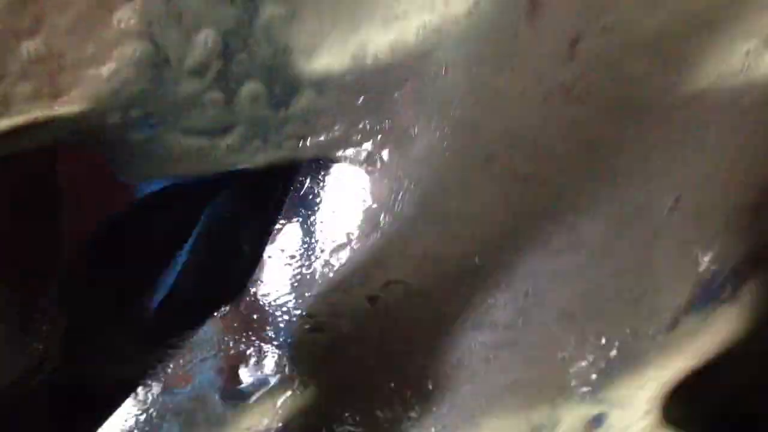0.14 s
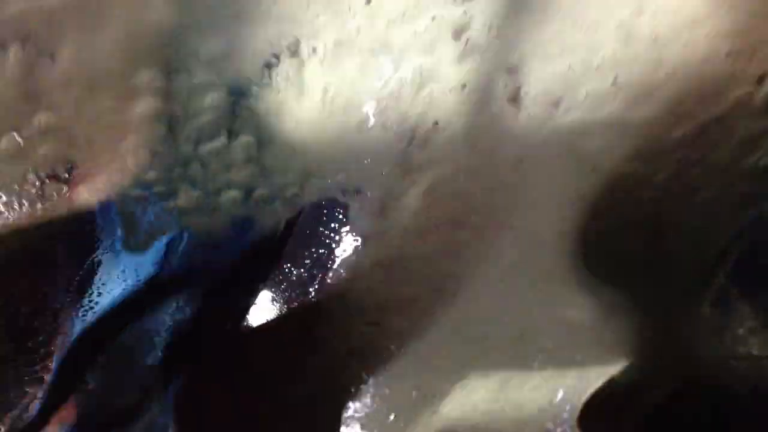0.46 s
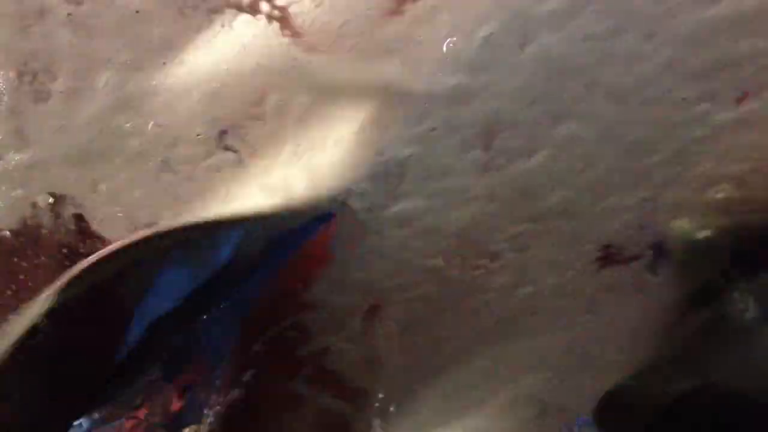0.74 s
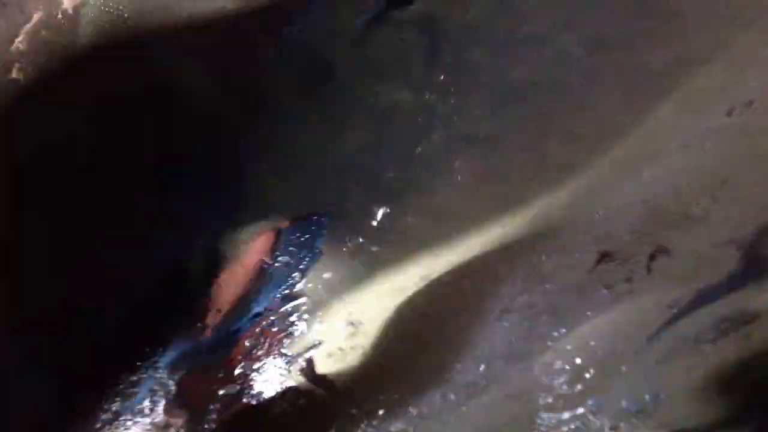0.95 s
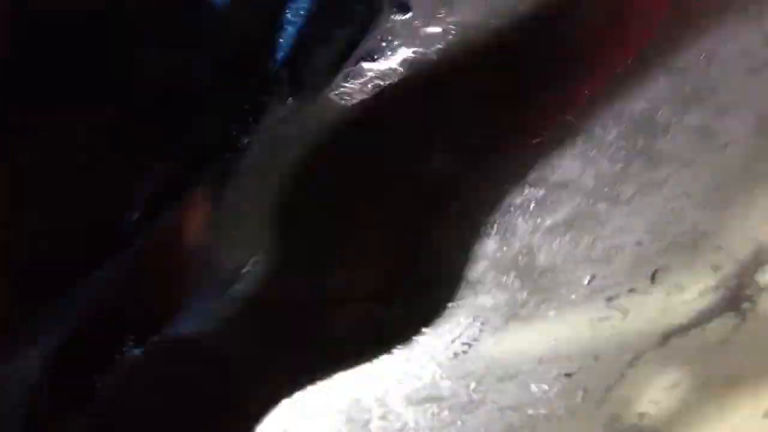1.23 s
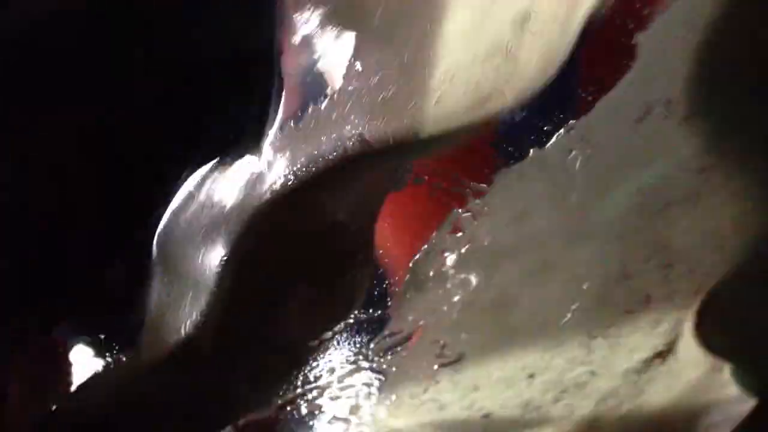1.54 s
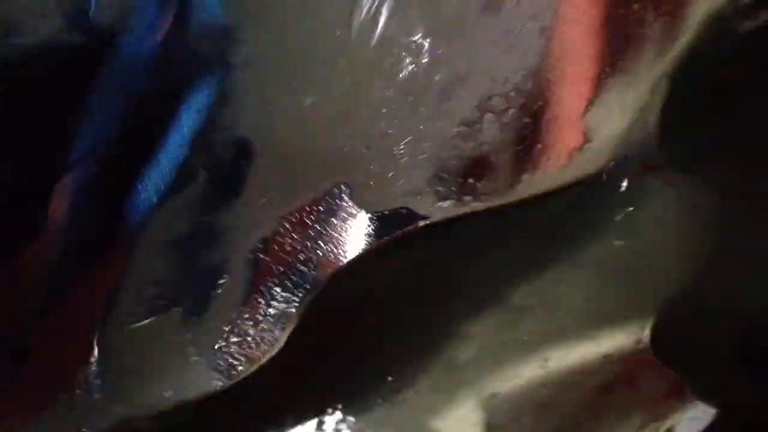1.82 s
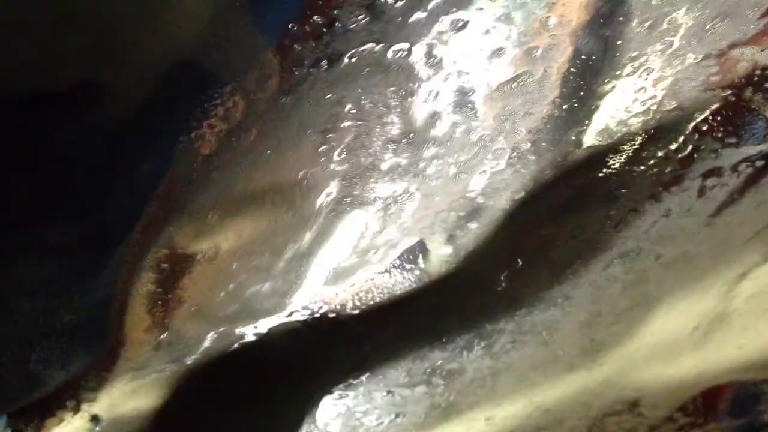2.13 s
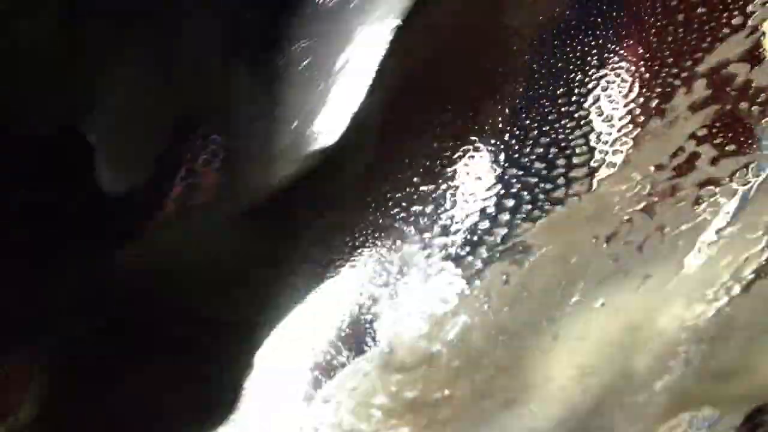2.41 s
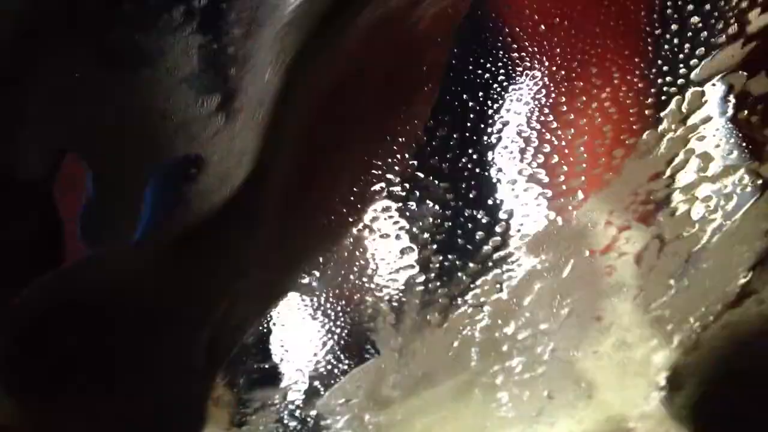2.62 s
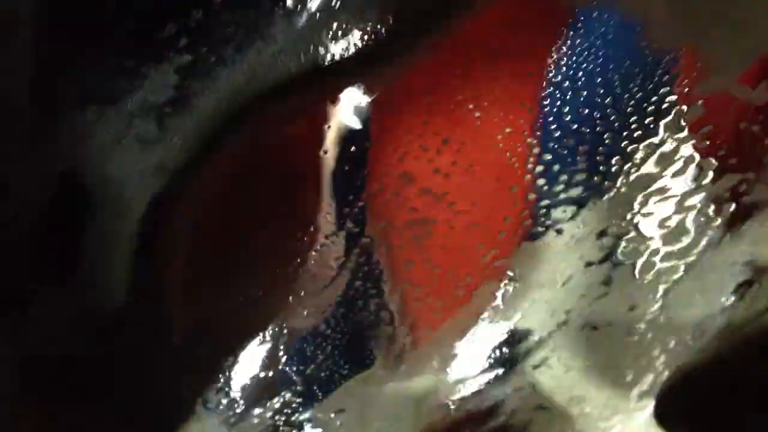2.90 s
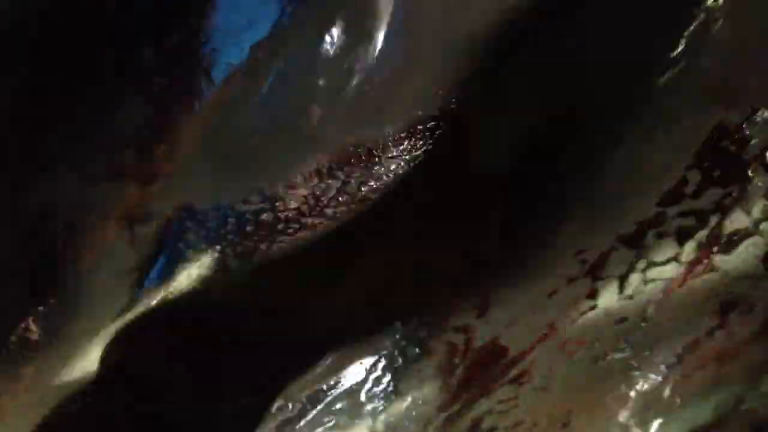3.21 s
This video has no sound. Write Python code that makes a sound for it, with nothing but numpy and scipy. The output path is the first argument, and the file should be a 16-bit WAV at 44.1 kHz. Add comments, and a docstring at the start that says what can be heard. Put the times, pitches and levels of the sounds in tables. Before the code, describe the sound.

Automatic car wash from inside the car, mono, dry cabin. Throughout, wet cloth strips slap the glass irregularly, about twenty times a second, splashy and crisp with duller smacks; a sharp one lands near 1.7 s. Low rumble stays steady; water hiss thins after 2 s. Soft panel booms grow heavier and rattlier from 1.9 to 2.9 s, strongest near 2.4. Brief faint hollow rubs, mostly before 1.8 s, one at 3.3.

```python
"""Inside a car in an automatic wash: wet cloth strips of a turning brush slap the glass unevenly, some twenty
times a second, each a burst of noise and droplets with spray, fine mist and a duller, lower smack.
Heavier bunches thump the body panels: two decaying modes boom and higher ones rattle as filtered noise.
Slow-wavering low noise is the machinery's rumble through the panels; ticking bright noise is the water's hiss.
Now and then cloth rubs the glass with a brief hollow note, a single wavering tone."""
import sys
import numpy as np
from scipy import signal
from scipy.fft import rfft, irfft, next_fast_len
from scipy.io import wavfile
from scipy.ndimage import uniform_filter1d, map_coordinates

SR = 44100
rng = np.random.default_rng(int(sys.argv[2]) if len(sys.argv) > 2 else 0)


def attenuation_scalar(level_db):
    """Turn a level in dB into a linear amplitude multiplier (20 dB per decade)."""
    decades = np.asarray(level_db, float) / 20
    return 10 ** decades


def pcm_store(signal):
    """Save signal as 16-bit PCM."""
    levels = np.round(np.clip(np.atleast_2d(signal), -1, 1) * 32767)
    wavfile.write(sys.argv[1], SR, levels.astype(np.int16).T)


N = 148176  # samples

# Cloth strips on the glass. Each row: peak time in seconds, spray level in dB, rise and fall in seconds
# per 10 dB (each layer scales the fall), smack level in dB ahead of the common smack gain.
STRIPS_ON_GLASS = [(0.073, -28.5, 0.013, 0.019, -30), (0.1285, -40, 0.0067, 0.0095, -37),
                   (0.1528, -28, 0.0023, 0.018, -28.5), (0.178, -34.5, 0.025, 0.0079, -36.5),
                   (0.1877, -27, 0.0054, 0.014, -29), (0.2298, -48, 0.01, 0.016, -40),
                   (0.268, -34.5, 0.002, 0.024, -36.5), (0.2884, -29, 0.01, 0.024, -32.5),
                   (0.395, -29.5, 0.01, 0.017, -27), (0.476, -45, 0.0026, 0.02, -38),
                   (0.494, -29, 0.0066, 0.011, -30.5), (0.518, -27.5, 0.016, 0.013, -30.5),
                   (0.583, -31.5, 0.0057, 0.02, -31), (0.6277, -29.5, 0.024, 0.013, -29),
                   (0.706, -31.5, 0.0035, 0.0097, -33), (0.7273, -28.5, 0.013, 0.016, -30.5),
                   (0.7607, -34, 0.0049, 0.023, -38), (0.836, -42, 0.0016, 0.02, -34),
                   (0.8475, -26.5, 0.0015, 0.023, -34), (0.862, -26.5, 0.012, 0.012, -30.5),
                   (0.921, -40, 0.002, 0.048, -40), (0.955, -29.5, 0.0036, 0.017, -35),
                   (0.9666, -29, 0.013, 0.009, -32.5), (1.027, -47, 0.0012, 0.024, -43),
                   (1.074, -31.5, 0.022, 0.0215, -32.5), (1.1397, -36.5, 0.017, 0.0152, -43),
                   (1.1612, -37, 0.018, 0.007, -37), (1.1804, -27, 0.009, 0.017, -30.5),
                   (1.2298, -44, 0.056, 0.018, -39), (1.2693, -35.5, 0.011, 0.027, -32.5),
                   (1.295, -33, 0.0048, 0.034, -30), (1.382, -31, 0.0006, 0.037, -36),
                   (1.4004, -28, 0.0064, 0.011, -27), (1.433, -36.5, 0.0077, 0.0016, -31.5),
                   (1.5234, -26, 0.022, 0.011, -27), (1.6054, -36, 0.0031, 0.0093, -34),
                   (1.6508, -31.5, 0.041, 0.019, -30), (1.6745, -40, 0.0022, 0.03, -39),
                   (1.7214, -31.5, 0.0069, 0.051, -32.5), (1.7384, -20, 0.0022, 0.016, -28),
                   (1.828, -40, 0.024, 0.011, -33), (1.866, -25, 0.0059, 0.023, -29),
                   (1.9136, -39, 0.0085, 0.022, -33), (1.988, -29.5, 0.0045, 0.026, -29),
                   (2.0311, -39, 0.013, 0.0056, -32.7), (2.077, -29.5, 0.0018, 0.016, -30.5),
                   (2.093, -32.5, 0.0052, 0.015, -30.5), (2.168, -40, 0.0023, 0.016, -32),
                   (2.209, -31, 0.033, 0.019, -30), (2.272, -44, 0.003, 0.025, -33),
                   (2.309, -44.4, 0.0015, 0.0061, -43), (2.3291, -28.5, 0.0006, 0.019, -42),
                   (2.345, -30, 0.0076, 0.018, -27), (2.3792, -38.5, 0.0068, 0.015, -43),
                   (2.441, -35, 0.0008, 0.028, -40), (2.4546, -28.5, 0.0022, 0.028, -32.5),
                   (2.51, -32.5, 0.021, 0.0088, -26), (2.5704, -43, 0.0021, 0.034, -38.5),
                   (2.607, -25.5, 0.0085, 0.018, -27), (2.6823, -33.5, 0.0083, 0.0089, -40.5),
                   (2.7255, -36, 0.0046, 0.007, -40), (2.746, -26, 0.0069, 0.012, -25),
                   (2.8, -38.0, 0.016, 0.0083, -33.5), (2.846, -34.5, 0.002, 0.016, -33.5),
                   (2.8692, -38, 0.0084, 0.015, -37), (2.9, -44, 0.0021, 0.032, -39),
                   (2.955, -39, 0.0035, 0.0084, -32), (3.025, -43.5, 0.0099, 0.054, -41),
                   (3.093, -43.5, 0.014, 0.018, -34), (3.172, -36, 0.01, 0.016, -33.5),
                   (3.2047, -41.5, 0.0245, 0.0127, -41), (3.216, -34.5, 0.003, 0.018, -34.5),
                   (3.2398, -37.5, 0.0042, 0.027, -35.5), (3.2907, -43, 0.0051, 0.0124, -42),
                   (3.3053, -29, 0.0006, 0.013, -29.5)]


def unit(x):
    """Normalisation: scales a signal to rms 1."""
    return x / np.sqrt(np.mean(x ** 2) + 1e-20)


def over_time(rows):
    """Linear interpolation: (seconds, value) points become one value per sample."""
    return np.interp(np.arange(N) / SR, *np.transpose(rows))


def wobble(rate):
    """Slow random modulation: a smooth curve through random knots, rate of them a second."""
    knots = rng.standard_normal(N // 100)
    return map_coordinates(knots, [np.arange(N) * rate / SR])


def coloured(x, spectrum):
    """Linear filtering: x takes the gains of (Hz, dB) points on a log-frequency axis, at rms 1."""
    size = next_fast_len(N + 8192)
    hz, db = np.transpose(spectrum)
    bins_hz = np.fft.rfftfreq(size, 1 / SR)
    gain = attenuation_scalar(np.interp(np.log(bins_hz + 1), np.log(hz + 1), db))
    return unit(irfft(rfft(x, size) * gain, size)[:N])


def patchy(patchy_db, order):
    """Non-stationary noise: random gains smoothed over 5 bins (about 860 Hz) and order frames."""
    cells = signal.stft(rng.standard_normal(N), nperseg=256)[2]
    field = uniform_filter1d(rng.standard_normal(cells.shape), size=5, axis=0)
    field = uniform_filter1d(field, size=order, axis=1)
    noise = signal.istft(cells * attenuation_scalar(patchy_db * unit(field)), nperseg=256)[1]
    return unit(noise[:N])


def droplets(per_s):
    """Random impulse process: scattered ticks of uneven size, whose strength swells in clumps."""
    hits = rng.random(N) < per_s / SR
    sizes = rng.standard_normal(N)
    clumps = attenuation_scalar(3 * wobble(rate=300))
    return unit(hits * sizes * clumps)


def machinery():
    """Structure-borne sound: motors, pumps and lighter cloth keep the panels murmuring as low noise."""
    # Each row: frequency in Hz, relative density in dB per Hz.
    rumble_spectrum = [(15, -65), (25, -42), (59, -29), (100, -13.5), (135, -3), (165, -1.5), (200, -3.5),
                       (240, -9), (300, -4.5), (370, -6.5), (480, -16), (600, -18.5), (1400, -30.5),
                       (2500, -55.5)]
    # Each row: time in seconds, rumble level in dB ahead of the 2.7 dB lift below.
    rumble_course = [(0.0, -30), (0.35, -31.5), (1.24, -29), (1.44, -30), (1.84, -28.5), (2.22, -30),
                     (3.01, -30.5), (3.36, -30)]
    level_db = over_time(rumble_course) + 2.7 + 0.91 * wobble(rate=12)
    return attenuation_scalar(level_db) * coloured(patchy(patchy_db=1.35, order=8), rumble_spectrum)


def water():
    """Turbulence noise: jets and run-off hiss, with the sparse ticks of spatter among it."""
    # Each row: frequency in Hz, relative density in dB per Hz.
    hiss_spectrum = [(700, -43), (1400, 5.5), (2220, 3.5), (3200, -5.5), (4250, -6), (5280, -5.5),
                     (7310, -13), (9570, -24), (14400, -37), (17000, -40)]
    # Each row: time in seconds, hiss level in dB.
    hiss_course = [(0, -39), (.8, -44.5), (1.6, -41), (2.1, -51), (2.6, -49), (3.36, -46.5)]
    level_db = over_time(hiss_course) + 0.79 * wobble(rate=23)
    ticks = 0.25 * droplets(per_s=500)
    return attenuation_scalar(level_db) * coloured(ticks + patchy(patchy_db=2.5, order=6), hiss_spectrum)


def thumps():
    """Modal excitation: a soft push swells and damps two panel modes and rattles the higher ones."""
    # Cloth bunches on the panels. Each row: peak time in seconds, boom level in dB, boom frequency in Hz,
    # boom length in milliseconds between its -10 dB points, upper panel mode level in dB.
    bunches = [(0.106, -25.5, 164.7, 130, -53), (0.176, -28.5, 175, 24, -51), (0.318, -19.5, 164, 17, -55),
               (0.352, -24, 161, 27, -47), (0.417, -25.5, 166, 64, -49), (0.513, -28, 177, 35, -34),
               (0.76, -32, 155, 39, -43), (0.939, -21, 167.6, 58, -55), (1.035, -21, 173, 10, -29),
               (1.134, -32, 184.6, 380, -38), (1.25, -26.5, 169.5, 114, -43), (1.411, -24, 164, 57, -56),
               (1.465, -30, 182, 43, -33), (1.588, -25, 162.5, 83, -28.5), (1.699, -38, 172, 55, -25.5),
               (1.802, -24.5, 169, 72, -31), (1.924, -17, 149, 60, -23), (1.995, -27, 169, 88, -37),
               (2.05, -22, 146, 49, -30.5), (2.15, -27, 142.4, 79, -32), (2.19, -20.5, 163, 19, -36),
               (2.223, -27, 152, 14, -50), (2.286, -21.5, 141, 57, -30), (2.364, -13.5, 145, 25.5, -23),
               (2.392, -37, 161.0, 16, -50), (2.514, -17.5, 150, 26.6, -24.5),
               (2.653, -18.5, 139, 43, -29.5), (2.754, -30, 153, 11, -27), (2.791, -17.5, 149, 36, -24.5),
               (2.871, -21.5, 155, 18, -26.7), (3.085, -28, 165, 40, -26.5), (3.125, -25, 158, 49, -37),
               (3.222, -25.5, 139, 53, -31), (3.258, -30.5, 144, 48, -31)]
    # Higher panel modes. Each row: frequency in Hz, relative density in dB per Hz.
    panel_spectrum = [(280, -45), (430, 8), (560, 1.5), (700, -7.5), (790, 6.5), (850, -15), (900, 4),
                      (960, -5), (1300, -4.5), (1600, -41.5)]
    # Loose cloth ends drumming on the panel. Each row: time in seconds, level in dB.
    patter_course = [(0, -37.5), (1, -45.5), (1.5, -42.5), (2, -47), (2.7, -38), (3.36, -58)]
    upper_hz, upper_spread_hz = 357.7, 12
    upper_length = 0.78  # as a share of the boom's length
    rise_share, edge = 0.37, 3  # share of a thump spent rising; steepness of its flanks
    knock_db = -5.5  # rattle over the upper mode

    def flanks(u, length):
        """Rise and decay of a contact: dB loss grows as a power of the time from the peak."""
        side = length * np.where(u < 0, rise_share, 1 - rise_share)
        return attenuation_scalar(-10 * np.abs(u / side) ** edge)

    tones, t = np.zeros(N), np.arange(N) / SR
    rattle = attenuation_scalar(over_time(patter_course) + 2.54 * wobble(rate=20))
    draws = rng.standard_normal((len(bunches), 3))  # boom phase, upper detuning, upper phase
    for (s, boom_db, hz, ms, upper_db), (boom_phase, detune, upper_phase) in zip(bunches, draws):
        near = slice(max(round((s - .15) * SR), 0), round((s + .2) * SR))
        u = t[near] - s
        boom = attenuation_scalar(boom_db) * flanks(u, ms / 1000) * np.sin(2 * np.pi * (hz * u + boom_phase))
        upper = attenuation_scalar(upper_db) * flanks(u, upper_length * ms / 1000)
        mode_hz = upper_hz + upper_spread_hz * detune
        upper_tone = upper * np.sin(2 * np.pi * (mode_hz * u + upper_phase))
        tones[near] += np.sqrt(2) * (boom + upper_tone)  # levels are rms
        rattle[near] += attenuation_scalar(knock_db) * upper
    return tones + rattle * coloured(rng.standard_normal(N), panel_spectrum)


def swell(level_db, lingers):
    """Energy summation: every slap rises and falls straight in dB, and their powers add."""
    s, _, rise, fall, _ = np.transpose(STRIPS_ON_GLASS)[:, :, None]
    coarse = np.arange(0, N, 16)  # the envelope is worked out every 16 samples
    t = coarse / SR - s
    down_db = 10 * np.where(t < 0, -t / (rise + 1e-6), t / (fall * lingers + 1e-6))
    down_db = np.clip(down_db, 0, 200)
    power = np.sum(attenuation_scalar(level_db[:, None] - down_db) ** 2, axis=0)
    return np.interp(np.arange(N), coarse, np.sqrt(power))


def slaps():
    """Impact noise: spray and mist are droplets on noise, the smack the lower part of the same contact."""
    # In each of the three spectra, each row: frequency in Hz, relative density in dB per Hz.
    spray_spectrum = [(2500, -19.5), (3800, -7.5), (4400, -4), (5240, 0), (5800, 0), (7300, 0.5),
                      (8800, -6), (9800, -21.5), (12000, -24)]
    mist_spectrum = [(6000, -34), (8000, -16), (9500, 3.5), (12000, 3), (14500, -2), (15300, -10),
                     (17000, -20)]
    smack_spectrum = [(250, -23.5), (500, -1.5), (700, -3), (1150, -1), (1400, -5), (1900, -4), (2200, 0),
                      (3000, -3), (3600, -6.5), (4300, -21.5), (6000, -39)]
    # Each row: time in seconds, level of the mist over the spray in dB, ahead of the snap.
    mist_over_spray = [(0, -17), (.6, -12), (1.2, -11), (1.8, -13), (2.4, -12.5), (2.9, -18), (3.36, -11.5)]
    snap_db, snap_rise_s = 5, 0.0024  # most extra mist of an abrupt slap; the rise that halves those dB
    smack_gain_db = 3
    _, spray_db, rise, _, smack_db = np.transpose(STRIPS_ON_GLASS)

    drops = droplets(per_s=3500)
    fine = 0.33 * drops + 0.67 * patchy(patchy_db=-4.5, order=3)
    wet = 0.3 * drops + 0.7 * patchy(patchy_db=2.5, order=4)
    dull = 0.81 * wet + patchy(patchy_db=2.4, order=6)

    spray = swell(spray_db, lingers=0.9) * coloured(wet, spray_spectrum)
    snap = snap_db / (1 + (rise / snap_rise_s) ** 2)
    mist_swell = swell(spray_db + snap, lingers=0.9) * attenuation_scalar(over_time(mist_over_spray))
    mist = mist_swell * coloured(fine, mist_spectrum)
    smack = swell(smack_db + smack_gain_db, lingers=1.39) * coloured(dull, smack_spectrum)
    return spray + mist + smack


def cabin(x):
    """Reverberation: the padded inside of the car answers with a short, exponentially decaying tail."""
    t60_s = 0.066
    t = np.arange(SR // 5) / SR
    tail = rng.standard_normal(len(t)) * attenuation_scalar(-60 * t / t60_s)
    return signal.fftconvolve(x, tail / np.linalg.norm(tail))[:N]


def rubs():
    """Friction tone: wet cloth rubbing the glass gives one slightly wavering note that swells and fades."""
    # Each row: centre time in seconds, frequency in Hz, level in dB (rms at the peak).
    notes = [(.1, 1140, -35), (.7, 1050, -39), (1.21, 883, -36), (1.335, 900, -34), (1.5, 804, -31.5),
             (1.745, 910, -35), (3.27, 796, -36)]
    half_length_s = 0.017  # from the peak to 1/e of it
    t = np.arange(N) / SR
    waver = 0.64 * wobble(rate=28)  # radians
    out = np.zeros(N)
    for s, hz, db in notes:
        bell = np.exp(-((t - s) / half_length_s) ** 2)
        out += np.sqrt(2) * attenuation_scalar(db) * bell * np.sin(2 * np.pi * hz * t + waver)
    return out


def scene():
    """Superposition: machinery, water, panels, cloth and its cabin tail add at one microphone."""
    cloth = slaps()
    cloth_in_cabin = cloth + attenuation_scalar(-11.5) * cabin(cloth)
    mix = machinery() + water() + thumps() + cloth_in_cabin + rubs()
    return mix[None]


def roll_off(x):
    """The treble ends steeply here."""
    return signal.sosfilt(signal.butter(12, 15330, fs=SR, output="sos"), x)


def record(dry):
    """Single-channel pickup: the finished mix is taken at its own level."""
    return roll_off(dry)


dry = scene()
out = record(dry)
pcm_store(out)
```